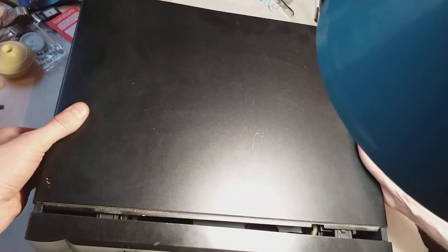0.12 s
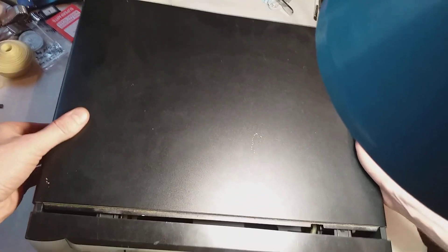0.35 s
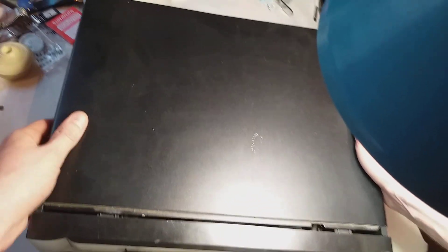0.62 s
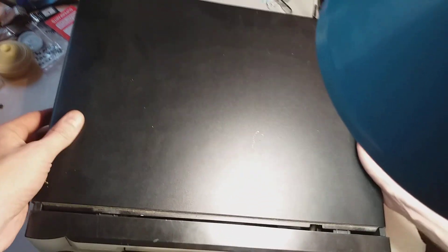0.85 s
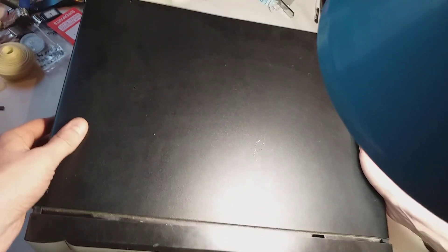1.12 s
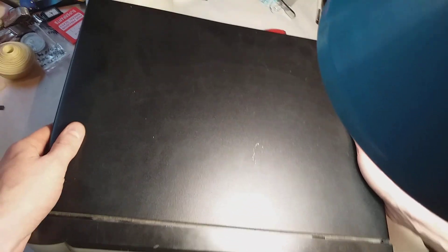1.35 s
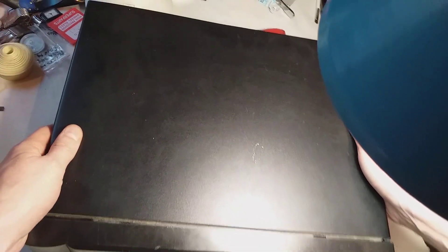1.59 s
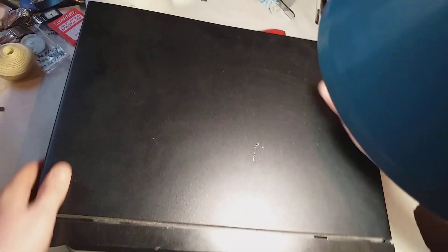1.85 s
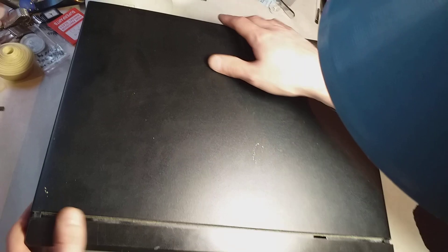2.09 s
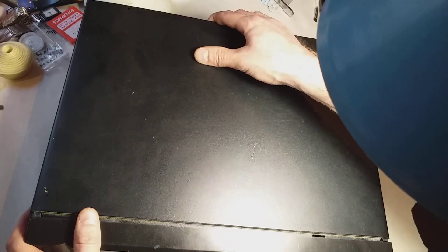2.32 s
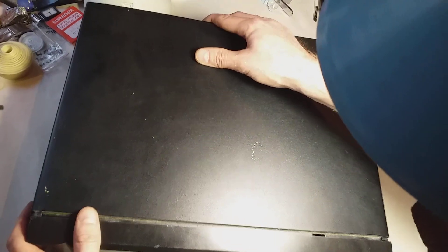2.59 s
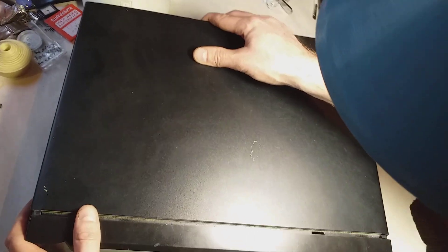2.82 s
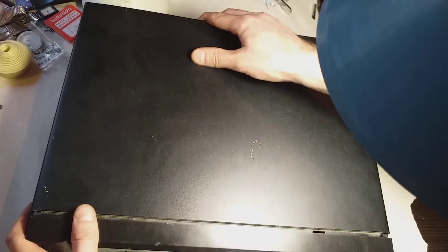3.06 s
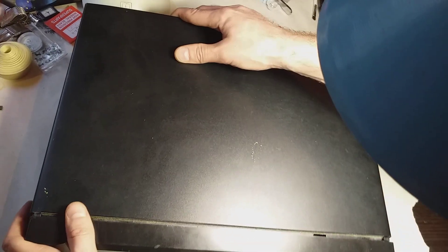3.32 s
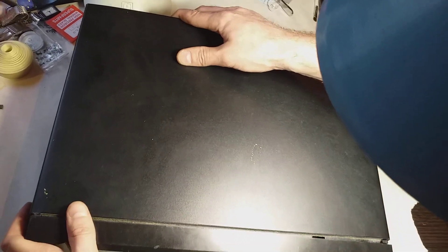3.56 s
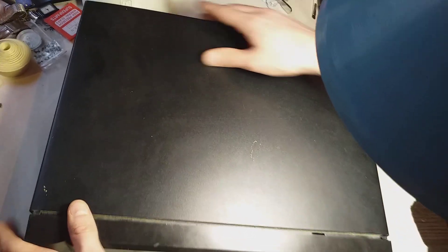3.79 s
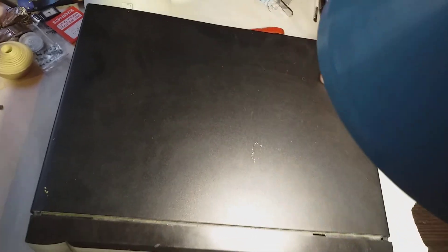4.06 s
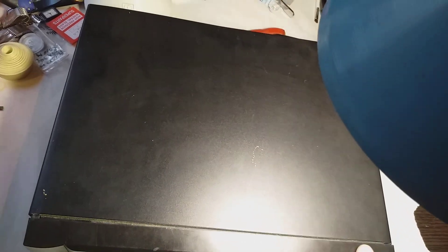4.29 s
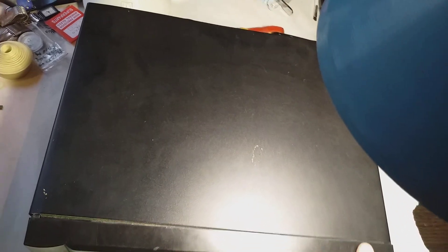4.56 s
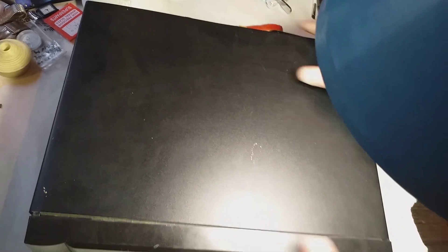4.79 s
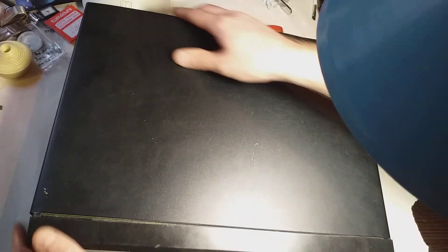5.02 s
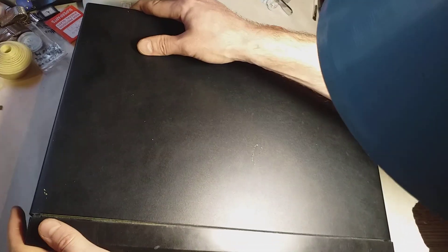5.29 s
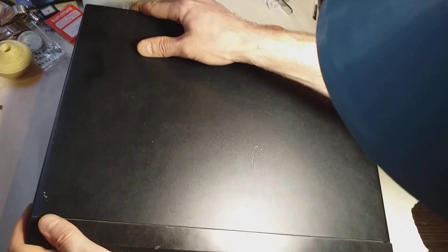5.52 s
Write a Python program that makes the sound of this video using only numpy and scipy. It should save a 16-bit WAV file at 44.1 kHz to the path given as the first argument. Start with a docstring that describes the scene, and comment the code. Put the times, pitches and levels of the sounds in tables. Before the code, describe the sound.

Near microphone, dry small room with faint air and a barely audible high whine. A plastic panel grinds along its rails and knocks irregularly, with dull thumps from the desk beneath. It settles to a lower hollow tone, skin brushes its textured surface, activity thins, then a latch cracks home sharply at the end.

```python
"""Grinding and knocking plastic opens the scene: two hands slide a large cover onto a chassis on a desk.
Palms brush the textured lid, a rubber foot judders, and at the end a latch snaps home and rattles.
Random slips and short blows of force ring sine modes (desk, panel, ribs, flaps); coloured noise makes
the denser edges, tabs, skin and latch. A small quiet room adds sparse tails, air and a faint whine."""
import sys
import numpy as np
from scipy import signal
from scipy.io import wavfile
from scipy.ndimage import uniform_filter1d

SR = 44100
rng = np.random.default_rng(int(sys.argv[2]) if len(sys.argv) > 2 else 0)


def magnitude_from_level(level_db):
    """Linear magnitude for a level in decibels (20 dB per decade)."""
    exponent = np.asarray(level_db, float) / 20
    return 10 ** exponent


def inscribe(sig):
    """Save sig as 16-bit PCM at rate SR to the path in sys.argv[1].

    A 1-D sig is mono; a 2-D sig holds one channel per row.
    Samples are clipped to [-1, 1] before scaling.
    """
    pcm = np.round(np.clip(np.atleast_2d(sig).T, -1, 1) * 32767)
    wavfile.write(sys.argv[1], SR, pcm.astype(np.int16))


N = 249076

# All levels in the tables are relative: the functions below balance the layers.
# quiet room air: pitch_hz, level_db (per Hz)
AIR_COLOUR = [(24, 1), (40, -16), (151, 20), (354, -62), (896, 1), (1590, -8.5), (7170, -5.5), (9220, -11),
              (13800, -9), (16000, -7)]
# modes of the desk, the hollow panel and the clacking ribs: pitch_hz, level_db, t60_s
DESK_MODES = [(75.4, -5.5, 0.043), (103.2, -1, 0.11), (144.3, 4, 0.066), (195, -5, 0.029)]
PANEL_MODES = [(233, -9, 0.05), (289, -11.5, 0.083), (324.2, 0.5, .19), (358.5, 0, 0.097),
               (409.8, 7, 0.059), (454.2, -0.5, 0.11), (521.4, 3, 0.069), (591.5, 8, 0.072),
               (650, 5, 0.058)]
RIB_MODES = [(738.5, 0.5, 0.04), (828, 4.5, 0.032), (946, 8, 0.024), (979, 8, 0.018), (1190, 11, 0.016),
             (1280, 11, 0.016), (1370, 3.5, 0.032), (1433, 11.5, 0.016), (1538, 8, 0.021),
             (1723, 21, 0.0076), (2080, 6, 0.028), (2644, 8, 0.012)]
# modes of loose flaps along the rim: pitch_hz, level_db, t60_s
FLAP_MODES = [(2630, 10.5, 0.01), (3040, 2, 0.017), (3540, -4, 0.036), (4230, -9, 0.0084),
              (4920, -3, 0.024), (5170, 1, 0.0061), (7040, -24, 0.018)]
# edges and small tabs ring too densely to count: pitch_hz, level_db (per Hz)
EDGE_COLOUR = [(1500, -39), (2400, -3.5), (4200, 0), (5600, -5.5), (8300, -10), (9300, -17.5), (12000, -18),
               (16000, -20.5)]
TAB_COLOUR = [(5000, -16.5), (7500, -7.5), (9300, -16), (12500, -8), (14000, -16), (16500, -21)]
# the panel rings lower once it lies flat on the chassis: time_s, centre of its ring pitch_hz
SEATING = [(0, 421), (1.8, 420), (2.0, 348), (5.65, 355)]
# the hands work the cover about: time_s, flexing level_db, grit under the edges level_db
HANDLING = [(0.0, -46, -58), (0.15, -68, -70.5), (0.76, -56, -58.5), (1.0, -51, -60.5),
            (1.54, -56.5, -64.5), (1.81, -60.5, -66), (2.04, -99, -53.5), (2.19, -52.5, -57),
            (2.56, -55.5, -61.5), (2.8, -53.5, -73.5), (3.29, -57.5, -68), (3.56, -60.5, -88),
            (3.76, -53.5, -62), (3.88, -82, -53.5), (4.11, -61.5, -64), (4.45, -54, -65),
            (4.77, -62.5, -82), (5.0, -95, -89), (5.1, -51, -66.5), (5.47, -66.5, -71.5)]
# edges grind along the chassis rails: start_s, rise_s, hold_s, fall_s, level_db
SCRAPES = [(.04, 0.027, 0.0034, 0.0068, -38.5), (.14, .02, .02, 0.047, -54.5),
           (.335, .05, .003, 0.013, -36), (.395, 0.0082, 0.0024, 0.12, -40.5),
           (.75, 0.034, 0.053, .03, -45.5), (.84, 0.012, 0.0029, .04, -33),
           (1.045, .055, 0.046, 0.031, -41), (1.366, 0.0057, 0.0027, 0.11, -45.5),
           (1.99, 0.04, .003, 0.045, -55), (3.345, 0.048, 0.0012, .045, -45.5),
           (4.19, 0.021, .002, 0.0058, -50), (4.214, 0.0093, .003, 0.083, -40.5),
           (4.49, 0.019, .02, 0.069, -56), (4.92, 0.018, 0.062, .02, -62), (5.01, 0.04, .005, 0.058, -45)]
# decay of the room: pitch_hz, t60_s
ROOM_DECAY = [(80, 0.27), (300, 0.26), (1500, 0.23), (5000, 0.21), (12000, 0.18)]
# knocks: start_s, panel level_db, edges level_db, ribs level_db, ribs struck near pitch_hz
KNOCKS = [(0.0195, -38.5, -43.5, -47, 830), (0.076, -24.5, -26.5, -28.5, 784), (0.083, -42, -45, -35, 1145),
          (0.228, -50, -51.5, -60, 1450), (0.3377, -38, -45, -53.5, 907), (0.379, -32, -35, -39, 1020),
          (0.403, -33, -32, -34, 820), (0.41, -29, -45, -32, 910), (0.4445, -46, -55, -54, 877),
          (0.6544, -50.5, -46, -50.5, 850), (0.7377, -47.5, -60, -75, 796),
          (0.772, -39.5, -45.5, -55, 1280), (0.8005, -43, -38, -49, 795), (0.8131, -36.5, -44, -47, 2080),
          (0.853, -36, -36, -34.5, 1090), (1.0146, -40, -53, -48, 1105), (1.067, -40, -37.5, -49, 958),
          (1.0757, -34, -57, -45.5, 1040), (1.0857, -33, -44, -71, 929), (1.1139, -35, -35.5, -43.5, 2070),
          (1.1444, -33.5, -35, -42.5, 1210), (1.2374, -41.5, -50.5, -52, 1310),
          (1.3384, -59, -47, -64, 824), (1.3725, -39, -40, -65, 942), (1.4677, -70, -43, -67, 875),
          (1.5814, -44.5, -62, -65, 802), (1.5933, -48, -43, -54, 1130), (1.6351, -40, -52, -54, 850),
          (1.686, -65, -47.5, -65, 832), (1.709, -44, -49, -60, 802), (2.0005, -43, -44, -43.5, 1030),
          (2.022, -33.5, -61, -40.5, 1070), (2.0377, -67, -35, -41, 824), (2.0542, -36, -50, -57, 830),
          (2.2062, -56, -38.5, -47.5, 2080), (2.445, -37.5, -28.5, -26, 1340),
          (2.483, -34.5, -35.5, -42, 1190), (2.627, -34, -31, -29, 1370), (2.645, -23, -30, -34, 890),
          (2.653, -31.5, -39, -29, 1370), (2.6683, -29, -56, -60, 1370), (2.741, -58, -40.5, -58, 1190),
          (2.7944, -49.5, -53, -59, 795), (2.9352, -29.5, -35.5, -40, 850),
          (2.9464, -56, -31.5, -38.5, 1330), (3.066, -45.5, -54, -51, 900), (3.1, -43.5, -52, -56, 910),
          (3.2646, -50, -72, -79, 810), (3.3094, -66, -43.5, -61, 1850), (3.3495, -38.5, -40, -53.5, 2110),
          (3.391, -38, -62, -45.5, 830), (3.4873, -40.5, -48, -49, 770), (3.6484, -51, -86, -74, 1360),
          (3.719, -47, -47, -47.5, 870), (4.2072, -42, -38.5, -44, 790), (4.2196, -34, -47, -38, 964),
          (4.2552, -36.5, -47, -57, 826), (4.381, -47, -49.5, -53.5, 1410), (4.4194, -42, -51.5, -63, 1370),
          (4.49, -67, -42.5, -59, 2100), (4.506, -69, -45, -64, 2100), (4.562, -35, -48.5, -44, 810),
          (4.576, -42.5, -59, -47.5, 950), (4.94, -58, -51, -65, 1060), (5.029, -50, -41, -65, 982),
          (5.0461, -43, -53, -53, 975), (5.4545, -50.5, -44, -52, 790), (5.4895, -22, -7, -19.5, 1680),
          (5.5, -16.5, -24, -19.5, 1460), (5.509, -43, -8, -18.5, 940), (5.5169, -22, -25, -16, 796),
          (5.5337, -28, -19, -22, 1150)]
# the chassis thumps on the desk: start_s, level_db
THUMPS = [(0.076, -33), (0.099, -34), (0.231, -45), (0.341, -43), (0.377, -32), (0.405, -35), (0.572, -51),
          (0.801, -33), (0.827, -35.5), (0.861, -36), (1.076, -35.5), (1.108, -30.5), (1.247, -41),
          (1.372, -32.5), (1.419, -39.5), (1.636, -47.5), (2.014, -29.5), (2.459, -32), (2.501, -33.5),
          (2.641, -42), (2.669, -29.5), (2.796, -38), (2.94, -27), (3.262, -41), (3.35, -35), (3.662, -60),
          (4.212, -33), (4.253, -35.5), (4.416, -31.5), (4.553, -43), (4.939, -48), (5.031, -35.5),
          (5.08, -44), (5.453, -47.5), (5.504, -18.5), (5.521, -33)]
# small tabs tick very high: start_s, level_db
TICKS = [(0.0751, -42), (0.8006, -39.5), (0.869, -46), (1.0652, -42.5), (1.431, -54), (2.4366, -50),
         (2.6918, -52), (2.882, -53), (2.9202, -49), (3.311, -60), (3.48, -55), (4.2, -75), (5.418, -50),
         (5.454, -52)]
# skin brushes the textured lid: start_s, rise_s, hold_s, fall_s, level_db
BRUSHES = [(1.3, 0.018, 0.11, 0.017, -59.5), (1.424, .008, .002, 0.018, -49),
           (1.49, 0.033, .002, 0.015, -52), (1.68, .1, 0.27, 0.29, -48), (3.055, 0.02, 0.13, 0.035, -52.5),
           (3.68, 0.016, 0.065, 0.091, -61), (3.72, 0.19, .06, .22, -44.5),
           (4.225, 0.021, .005, 0.038, -49.5), (4.69, 0.024, .01, 0.068, -57),
           (4.99, 0.013, 0.17, 0.057, -50.5), (5.38, 0.039, .002, 0.018, -54.5)]
# sound of skin on the lid: pitch_hz, level_db (per Hz)
SKIN_COLOUR = [(710, -3), (1200, 2), (1680, -4.5), (2400, -5.5), (3550, 0), (7820, 0.5), (9610, -4.5),
               (12300, -1.5), (15200, -1), (16000, -8.5)]
# a rubber foot judders on the desk: time_s, slips per second pitch_hz, level_db
JUDDER = [(2.09, 140, -56), (2.094, 121, -42), (2.11, 99, -41.5), (2.18, 109, -39.5), (2.214, 130, -54),
          (2.25, 110, -63)]
# the latch snaps and rattles: start_s, level_db, decay of the rattle rattle_s
LATCH = [(5.4901, 11, 0.0018), (5.5025, 10, 0.02), (5.5101, 6, 0.0096), (5.5364, -18, 0.0049),
         (5.5537, -9, 0.015)]
# sound of the latch: pitch_hz, level_db (per Hz)
LATCH_COLOUR = [(700, -43), (1300, 2), (3000, -4.5), (5500, 9), (8200, 9), (9250, -3.5), (12000, 3.5),
                (14300, 1.5), (16500, -20)]


def evened(x):
    """Scales to rms 1."""
    return x / np.sqrt(np.mean(x ** 2) + 1e-20)


def read(points, hz):
    """Reads a table on a log-frequency axis."""
    f, value = np.transpose(points)
    return np.interp(np.log(hz + 1), np.log(f + 1), value)


def colour(points, size=2048):
    """Causal impulse of energy 1 with the given spectrum, built as minimum phase."""
    hz = abs(np.fft.fftfreq(size, 1 / SR))
    log_gain = np.log(magnitude_from_level(np.maximum(read(points, hz), -90)))
    spectrum = np.exp(np.conj(signal.hilbert(log_gain)))
    taps = np.fft.ifft(spectrum).real[:size // 2]
    return taps / np.linalg.norm(taps)


def through(x, taps):
    """Causal convolution cut to length."""
    return signal.oaconvolve(x, taps)[:len(x)]


def ring(modes, near_hz, octaves, rest=0.42, rise_s=0.0003):
    """Sines that swell and decay, strongest near the given pitches; one row of energy 1 for each pitch."""
    hz, db, t60 = np.transpose(modes)[:, :, None]
    t = np.arange(SR // 4) / SR
    sines = magnitude_from_level(db - 60 * t / t60) * np.sin(2 * np.pi * hz * t)
    distance = np.log2(hz.T / np.reshape(near_hz, (-1, 1))) / octaves
    # modes far from the blow keep the share "rest"
    taps = (rest + np.exp(-distance ** 2)) @ sines
    taps *= 1 - np.exp(-t / rise_s)
    return taps / np.linalg.norm(taps, axis=1, keepdims=True)


def curve(rows):
    """Columns of a table joined by straight lines at every sample, -120 outside."""
    s, *columns = np.transpose(rows)
    t = np.arange(N) / SR
    return [np.interp(t, s, column, -120, -120) for column in columns]


def strokes(rows):
    """Gain of separate strokes, each with a rise, a hold and a fall."""
    start, rise, hold, fall, db = np.transpose(rows)[:, :, None]
    t = np.arange(0, N, 32) / SR - start
    shape = np.minimum(np.minimum(t / rise - 1, (rise + hold - t) / fall), 0)
    # a stroke climbs and sinks by 20.5 dB in its rise and fall
    gain = (magnitude_from_level(db + 20.5 * shape) * (t > 0)).sum(0)
    return uniform_filter1d(np.repeat(gain, 32)[:N], 200)


def slips(per_s, spread_db):
    """Random clicks, a few of them large, rms 1."""
    size = magnitude_from_level(spread_db * np.minimum(rng.exponential(1, N), 5))
    happens = rng.random(N) < per_s / SR
    return evened(size * happens * rng.standard_normal(N))


def contacts(s, db, blow_s, chatter_s, taps, blow=0):
    """A rounded blow and a short chatter of force through its own ring; energy as of 20 ms at the level given."""
    t = np.arange(4096) / SR
    fade = np.exp(-t / chatter_s) * (1 - np.exp(-t / blow_s))
    chatter = rng.standard_normal((len(s), len(t))) * fade
    push = t * np.exp(-2 * t / blow_s)
    force = chatter / np.linalg.norm(chatter, axis=1, keepdims=True) + blow * push / push.sum()
    sound = signal.fftconvolve(force, np.atleast_2d(taps), axes=1)
    sound *= magnitude_from_level(db)[:, None] * np.sqrt(SR / 50) / np.linalg.norm(sound, axis=1, keepdims=True)
    out = np.zeros(N + sound.shape[1])
    first = np.round(s * SR).astype(int)[:, None]
    np.add.at(out, first + np.arange(sound.shape[1]), sound)
    return out[:N]


def quiet():
    """Room air as coloured noise, and faint electronics: a thin line in a narrow hiss."""
    whine_hz, fuzz_hz = 14002, 300
    turn = np.exp(2j * np.pi * whine_hz * np.arange(N) / SR)
    lowpass = signal.butter(2, fuzz_hz, fs=SR, output="sos")
    fuzz = signal.sosfilt(lowpass, rng.standard_normal((2, N)))
    line = magnitude_from_level(-84) * np.sqrt(2) * turn.real
    # slow noise carried up to the whine makes a hiss on both sides of it
    hiss = magnitude_from_level(-77) * evened((turn * (fuzz[0] + 1j * fuzz[1])).real)
    air = magnitude_from_level(-68.5) * through(rng.standard_normal(N), colour(AIR_COLOUR, size=8192))
    return air + line + hiss


def sliding():
    """Random slips under the moving cover shake the desk, panel, ribs and edges."""
    flex, grit = (magnitude_from_level(column) for column in curve(HANDLING))
    push = magnitude_from_level(-2.5) * flex  # share of the flexing that reaches the desk
    desk = through(push * slips(400, 3), ring(DESK_MODES, 130, 1.5)[0])

    hz = curve(SEATING)[0]
    loose = np.clip((hz - hz[-1]) / (hz.max() - hz[-1]), 0, 1)
    bending = flex * slips(750, 1.96)
    loose_ring, seated_ring = ring(PANEL_MODES, [hz.max(), hz[-1]], 0.48, 0.27)
    panel = through(np.sqrt(loose) * bending, loose_ring)
    panel += through(np.sqrt(1 - loose) * bending, seated_ring)

    creep = grit * slips(2500, 2.26)
    grind = strokes(SCRAPES) * slips(1600, 2.6)
    ribs = through(magnitude_from_level(0.5) * (creep + grind), ring(RIB_MODES, 650, 0.88)[0])
    edges = through(magnitude_from_level(-4.5) * creep + magnitude_from_level(-5.0) * grind, colour(EDGE_COLOUR))
    return desk + panel + ribs + edges


def room(x, count=4):
    """Several random tails of sparse taps take turns at a steady rate, each band dying at its own speed."""
    taps = np.zeros((count, SR // 2))
    at = np.arange(200, SR // 2 - 20, 20)
    places = at + rng.integers(0, 20, (count, len(at)))
    signs = rng.choice([-1., 1.], (count, len(at)))
    np.put_along_axis(taps, places, signs, 1)

    hz, t, z = signal.stft(taps, SR, nperseg=256)
    decay = magnitude_from_level(-60 * t / read(ROOM_DECAY, hz)[:, None])
    tails = signal.istft(z * decay, SR, nperseg=256)[1]
    tails /= np.linalg.norm(tails, axis=1, keepdims=True)

    low = signal.sosfilt(signal.butter(2, 650, fs=SR, output="sos"), x)
    high = signal.sosfilt(signal.butter(2, 650, "high", fs=SR, output="sos"), x)
    # lows turn more slowly (45 against 110 tails per second) and come back weaker
    turn = np.arange(N) / SR * np.array([[45], [110]])
    out = np.zeros(N)
    for k, tail in enumerate(tails):
        slow, fast = np.cos(np.pi * (turn + k) / count) ** 2 * np.sqrt(8 / 3 / count)
        out += through(magnitude_from_level(-2.5) * low * slow + high * fast, tail)
    return out


def knocks():
    """Every knock rings the panel and ribs near the blow, some loose flap and the edges; thumps and ticks join."""
    s, panel_db, edges_db, ribs_db, ribs_hz = np.transpose(KNOCKS)
    spot, flap = rng.random((len(s), 2)).T
    # each blow finds the panel up to 0.066 octaves higher or lower
    panel_hz = np.interp(s, *np.transpose(SEATING)) * 2 ** (0.066 * (2 * spot - 1))
    flap_hz = 2500 * 2 ** (1.58 * flap)

    desk_ring = ring(DESK_MODES, 140, 4.4, rest=0.1, rise_s=0.0057)
    panel_ring = ring(PANEL_MODES, panel_hz, 0.19, rest=0.25, rise_s=0.0013)
    ribs_ring = ring(RIB_MODES, ribs_hz, 0.12, rest=0.36, rise_s=0.0017)
    flaps_ring = ring(FLAP_MODES, flap_hz, 0.99, rest=0.043, rise_s=0.000063)

    desk = contacts(*np.transpose(THUMPS), 0.0038, 0.0064, desk_ring, blow=0.37)
    panel = contacts(s, panel_db, 0.0003, 0.0058, panel_ring, blow=1.43)
    ribs = contacts(s, ribs_db, 0.00031, 0.0055, ribs_ring, blow=1.59)
    flaps = contacts(s, edges_db, 0.0025, 0.01, flaps_ring)
    edges = contacts(s, edges_db, 0.006, 0.005, colour(EDGE_COLOUR))
    tabs = contacts(*np.transpose(TICKS), 0.0001, 0.0023, colour(TAB_COLOUR))
    # balance of desk, panel, ribs, flaps, edges and tabs
    body = magnitude_from_level(-6.0) * desk + panel + ribs
    return body + magnitude_from_level(-14.5) * flaps + magnitude_from_level(-11.5) * edges + magnitude_from_level(-7.5) * tabs


def palms():
    """Thousands of tiny skin slips on the grain of the lid merge into a wide hiss."""
    return strokes(BRUSHES) * through(slips(15000, 0.94), colour(SKIN_COLOUR))


def foot():
    """Unsteady stick and slip: a low buzz of three harmonics whose slips also ring the panel."""
    hz, db = curve(JUDDER)
    wander = 1 + 1.05 * uniform_filter1d(rng.standard_normal(N), 300)
    turns = np.cumsum(np.maximum(hz, 0) * wander) / SR
    buzz = sum(magnitude_from_level(-7.5 * k) * np.sin(2 * np.pi * (k + 1) * turns) for k in range(3))
    # one click for each whole turn
    slip = np.diff(np.floor(turns), prepend=0) * np.sqrt(SR / 100)
    level = np.sqrt(2) * uniform_filter1d(magnitude_from_level(db), 600)
    return level * buzz + magnitude_from_level(-8.5) * through(level * slip, ring(PANEL_MODES, 570, 0.28)[0])


def latch():
    """Hard bright cracks of coloured noise, each with its decaying rattle."""
    s, db, rattle_s = np.transpose(LATCH)
    return magnitude_from_level(-21.0) * contacts(s, db, 0.0017, rattle_s[:, None], colour(LATCH_COLOUR))


def scene():
    """Near sounds, their room tail and the quiet."""
    near = sliding() + knocks() + palms() + foot() + latch()
    return (magnitude_from_level(-3.0) * near + magnitude_from_level(-5.5) * room(near) + quiet())[None]


def top_cut(x):
    """Nothing passes above the cut-off."""
    return signal.sosfilt(signal.butter(12, 16880, fs=SR, output="sos"), x)


def record(dry):
    """The microphone rolls off the deep bass, rounds the loudest peaks and ends at its band edge."""
    thin = signal.sosfilt(signal.butter(4, 68, "high", fs=SR, output="sos"), dry)
    rounded = 0.85 * np.tanh(thin / 1.051)
    edge = signal.firwin(301, 16100, window=("kaiser", 8), fs=SR)
    return top_cut(signal.oaconvolve(rounded, edge[None], "same"))


dry = scene()
out = record(dry)
inscribe(out)
```